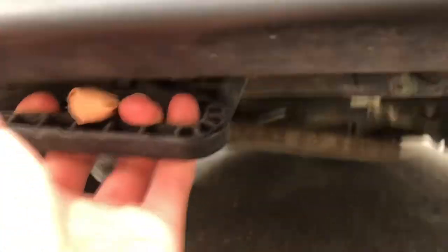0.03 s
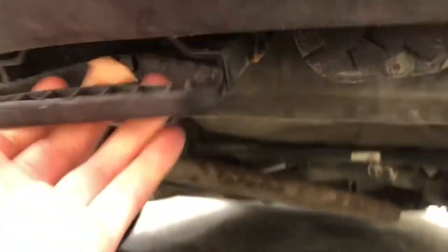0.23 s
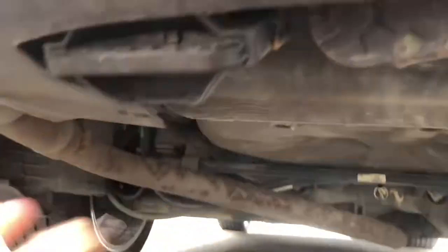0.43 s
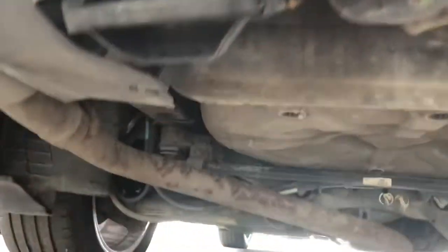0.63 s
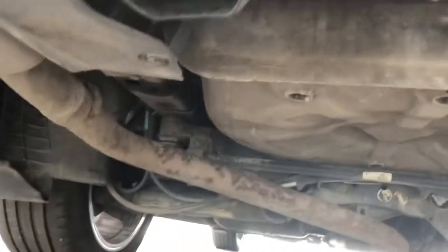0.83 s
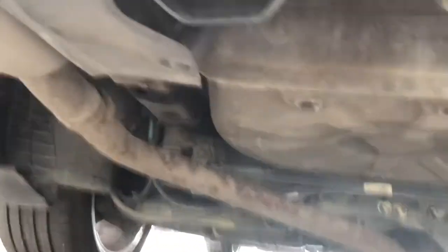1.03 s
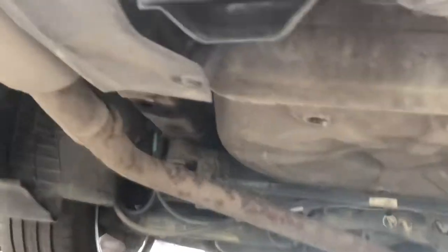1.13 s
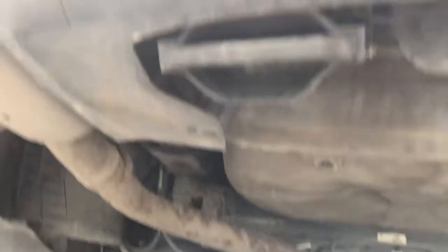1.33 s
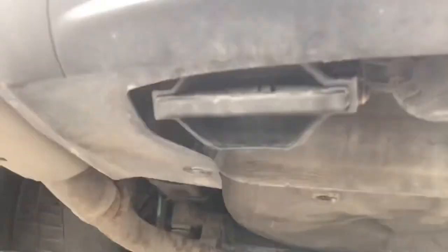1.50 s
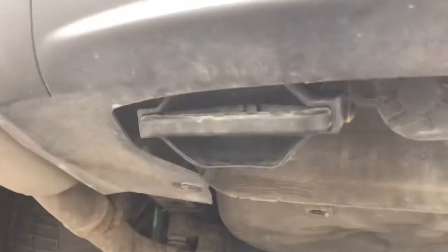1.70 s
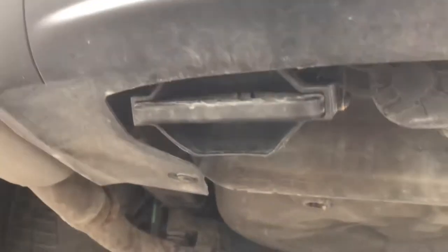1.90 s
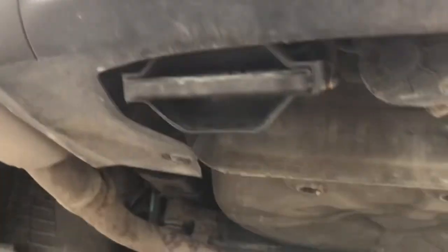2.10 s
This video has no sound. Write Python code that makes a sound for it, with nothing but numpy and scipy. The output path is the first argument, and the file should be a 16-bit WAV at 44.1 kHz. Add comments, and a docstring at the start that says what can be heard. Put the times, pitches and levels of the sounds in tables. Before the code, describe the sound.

A plastic tray scrapes, knocks and snaps into its holder under a car.

```python
"""A soft rustle, light finger taps and a brief thin whine, then a plastic tray scrapes into its holder
under a car, knocks twice on its guides and snaps home with a hard double clack. Each blow rings the
tray and scatters between floor pan and ground; the snap leaves an underbody panel humming. A sleeve
brushes past as the arm draws back, and faint ticks and far whistles follow over a quiet outdoor rumble."""
import sys
import numpy as np
from scipy import signal
from scipy.fft import rfft, irfft, next_fast_len
from scipy.io import wavfile

SR = 44100
rng = np.random.default_rng(int(sys.argv[2]) if len(sys.argv) > 2 else 0)


def bounce(signal):
    """Save signal as a 16-bit WAV file at the path given by the first command-line argument."""
    frames = np.transpose(np.atleast_2d(signal))
    limited = np.clip(frames, -1, 1)
    pcm = np.round(limited * 32767).astype(np.int16)
    wavfile.write(sys.argv[1], SR, pcm)


N = 94815
T = np.arange(N) / SR

# tray hits holder: t/s, force/dB, low edge/Hz, high edge/Hz, crack/dB, crack top/Hz, "guide" or "latch"
KNOCKS = [(0.2047, -18, 1200, 2520, -30, 2800, "guide"), (0.2058, -15, 600, 1700, -36.5, 2200, "guide"),
          (0.2336, -13.5, 1300, 5800, -20, 6000, "guide"), (0.2372, -15, 450, 1350, -36.5, 1500, "guide"),
          (0.2775, -7.5, 1900, 6600, -9, 14620, "latch"), (0.2778, -21, 680, 1100, -19, 2316, "latch"),
          (0.2815, 0, 680, 2000, -21.5, 9000, "latch"), (0.2840, -14, 2600, 9400, -14, 14500, "latch")]
# tray modes: f/Hz, t60/s, level struck at the guide/dB, level struck at the latch/dB
TRAY_MODES = [(320, .1, -18, -21.5), (620, 0.014, -17, -17.5), (712, 0.073, -5, -13.5),
              (853, 0.031, -8.5, -1), (1148, .034, -3, -3), (1270, 0.045, -7, -19.5),
              (1566, .024, -4, -5.5), (1920, .014, -7, -10), (2266, 0.025, -7.5, -18.5),
              (3100, 0.015, -16, -6), (3710, .013, -14, -4.5), (4060, 0.015, -10.5, -29),
              (5600, 0.015, -11, -5), (7060, .011, -24, -12), (8200, 0.021, -27.5, -10.5)]
# colour of the crack on each hit: f/Hz, level/dB
CRACK_COLOUR = [(450, -27), (1000, -6), (2100, 4.5), (2550, -5), (3200, -1), (6000, -1.5), (7600, -6.5),
                (8300, -3), (9300, -11), (12000, -16.5), (16000, -10)]
# underbody panel modes: f/Hz, level/dB, t60/s
PANEL_MODES = [(63, -44.5, .35), (108, -36.5, .25), (127, -31.5, .38), (183, -41.5, 0.59),
               (350.2, -27.5, 0.16), (533, -29.5, 0.2)]
# envelope of the scrape along the guides: t/s, level/dB
SLIDE_LEVEL = [(0.13, -69.5), (0.18, -57.5), (0.2, -39.5), (0.23, -39), (0.275, -40.5), (0.29, -80)]
# colour of the scrape: f/Hz, level/dB
SLIDE_COLOUR = [(150, -3), (400, -3), (700, 1), (1500, 4.5), (3000, -7.5), (4200, -8.5), (5500, -7.5),
                (10000, -9), (16000, -12)]
# light touches of fingers and plastic: t/s, level/dB, low edge/Hz, high edge/Hz, t60/s
TICKS = [(0.0145, -45, 420, 800, .06), (0.022, -39, 620, 744.4, .03), (0.129, -49.5, 2430, 15000, 0.068),
         (0.1605, -40, 999, 14250, 0.019), (0.1731, -48.5, 2054, 9985, 0.049), (0.175, -41, 620, 900, .035),
         (0.177, -36.5, 160, 281, 0.055), (0.194, -37, 1153, 1867, .04), (0.1995, -35, 4980, 15000, 0.022),
         (0.238, -29, 299.7, 380, .11), (0.26, -42.5, 3994, 10160, 0.018), (0.417, -51, 2450, 14000, 0.052),
         (0.927, -55.5, 299, 3555, 0.026), (0.99, -58, 1498, 3940, 0.03), (1.021, -54.5, 500, 3383, 0.046),
         (1.061, -58, 800, 3497, 0.028), (1.123, -59.5, 797, 2600, 0.057), (1.328, -55.5, 300, 1553, 0.062),
         (1.335, -56, 685, 4225, 0.019), (1.978, -50, 2600, 6900, .02), (1.983, -57, 2300, 7040, 0.15)]
# sleeve strokes: t/s, level/dB, attack/s, hold/s, release/s
SLEEVE_STROKES = [(-0.02, -51, 0.032, 0.0083, 0.088), (0.482, -53.5, 0.088, 0.067, 0.23)]
# colour of the cloth: f/Hz, level/dB
CLOTH_COLOUR = [(200, 5), (600, -4), (1100, -0.5), (2000, -9), (4000, -7), (8000, -12.5), (12000, -13.5),
                (16000, -20)]
# reverb colour of the gap between floor pan and ground: f/Hz, level/dB
GAP_COLOUR = [(100, -14), (330, -2), (440, -5.5), (600, -1), (830, 1), (1000, -8), (1190, -1), (1390, -5.5),
              (1560, 6), (1900, -6), (2400, -9.5), (3200, -5.5), (4700, -7.5), (7000, -12.5), (10000, -19),
              (16000, -24)]
# reverb decay in that gap: f/Hz, t60/s
GAP_T60 = [(100, 0.43), (500, 0.28), (800, .27), (1500, 0.28), (3500, .23), (8000, 0.2), (16000, 0.2)]
# colour of the outdoor air: f/Hz, level/dB
AIR_COLOUR = [(15, -58.5), (25, -31), (45, -8.5), (157, -3), (200, -10.5), (229, -5), (384, -13.5),
              (463, -12), (677, -17.5), (1020, -13), (1330, -20), (4490, -28.5), (4870, -29.5),
              (14800, -41.5), (16000, -46)]
# colour of the rumble: f/Hz, level/dB
RUMBLE_COLOUR = [(40, -20.5), (65, -5), (110, -3), (160, 1), (240, -0.5), (330, -13.5), (800, -54)]
# envelope of the rumble: t/s, level/dB
RUMBLE_LEVEL = [(0, -73), (0.12, -66.5), (0.8, -66), (1.05, -61.5), (1.3, -67), (1.42, -56.5), (1.55, -65),
                (2.15, -68)]
# tones of the opening whine: f/Hz, level/dB
WHINE_TONES = [(10791, -65), (14388, -64)]
# distant whistles: t/s, length/s, f/Hz, level/dB
WHISTLES = [(0.897, 0.14, 4620, -75), (1.165, 0.23, 3320, -76.5), (1.477, 0.12, 4620, -77.5),
            (1.678, 0.21, 3170, -77.5)]

FORCE_SEND_DB, RING_SEND_DB, CRACK_SEND_DB, SMALL_SEND_DB = 8.5, -28, -22.5, -12.5  # into the gap reverb


def blows(place):
    """The force of the tray hitting the guide or the latch: one band-limited click a blow."""
    return sum(from_db(db) * band(click(start), low, high, order=3)
               for start, db, low, high, _, _, where in KNOCKS if where == place)


def tray_ring(guide, latch):
    """The body of the clack: blows ring the tray's modes in a balance set by where they land."""
    return sum(ring(from_db(guide_db) * guide + from_db(latch_db) * latch, hz, t60)
               for hz, t60, guide_db, latch_db in TRAY_MODES)


def tray_crack(t60=.018):
    """The hard edge of the clack: a short burst of noise on every blow."""
    return sum(from_db(db) * dying(start, t60) * rms_one(band(noise(CRACK_COLOUR), low, top, order=4))
               for start, _, low, _, db, top, _ in KNOCKS)


def panel(start=.282, build_s=.02):
    """The snap spreads into the underbody panel, which swells and hums on."""
    hum = sum(from_db(db) * ring(click(start), hz, t60) for hz, db, t60 in PANEL_MODES)
    return rising(start, build_s) * hum


def slide(slips_per_s=4000):
    """Plastic rubs on plastic in dense tiny slips."""
    slips = (rng.random(N) < slips_per_s / SR) * rng.choice([-1, 1], N)
    sliding = (T > SLIDE_LEVEL[0][0]) & (T < SLIDE_LEVEL[-1][0])
    return sliding * level(SLIDE_LEVEL) * coloured(slips, SLIDE_COLOUR)


def ticks():
    """Fingers and plastic touch lightly, each a quickly dying noise burst in its own band."""
    touches = np.zeros(N)
    for start, db, low, high, t60 in TICKS:
        burst = dying(start, t60) * rng.standard_normal(N)
        makeup = np.sqrt(SR / 2 / max(high - low, 20))  # restores the power the filter takes away
        touches += from_db(db) * makeup * band(burst, low, high, order=3)
    return touches


def sleeve():
    """Brushing cloth hisses in soft strokes."""
    strokes = sum(from_db(db) * np.interp(T, start + np.cumsum([0, attack, hold, release]), [0, 1, 1, 0])
                  for start, db, attack, hold, release in SLEEVE_STROKES)
    return strokes * noise(CLOTH_COLOUR)


def under_car(send, predelay_s=.0034, build_s=.0026):
    """Dense reflections between floor pan and ground; the treble dies first."""
    edges_hz = np.geomspace(60, 17000, 13)
    wash = noise(GAP_COLOUR)
    tail = sum(band(wash, low, high, order=4) * dying(0, at_hz(GAP_T60, np.sqrt(low * high)))
               for low, high in zip(edges_hz, edges_hz[1:]))
    tail *= rising(predelay_s, build_s)
    return signal.fftconvolve(send, tail / np.sqrt(np.sum(tail ** 2)))[:N]


def outdoors(air_db=-59.5):
    """The bed: steady outdoor air and a wavering rumble."""
    return from_db(air_db) * noise(AIR_COLOUR) + level(RUMBLE_LEVEL) * noise(RUMBLE_COLOUR)


def whine(attack_s=.03, release_s=.018, end_s=.18):
    """Two faint, very high tones fade in and out at the start."""
    fade = np.clip(np.minimum(T / attack_s, (end_s - T) / release_s), 0, 1)
    return fade * sum(from_db(db) * np.sin(2 * np.pi * hz * T) for hz, db in WHINE_TONES)


def whistles(t60=.03):
    """Thin wavering tones far away: noise through a narrow resonance, under a rounded fade."""
    tones = np.zeros(N)
    for start, length, hz, db in WHISTLES:
        position = 2 * (T - start) / length - 1  # -1 to 1 across the whistle
        arch = np.sqrt(np.clip(1 - position ** 2, 0, 1))
        tones += from_db(db) * arch * rms_one(ring(rng.standard_normal(N), hz, t60))
    return tones


def from_db(db):
    """Decibels to gain."""
    return 10 ** (np.asarray(db) / 20)


def rms_one(x):
    """Scale to unit rms."""
    return x / np.sqrt(np.mean(x ** 2) + 1e-20)


def at_hz(points, hz):
    """Read a table on a log-frequency axis."""
    freqs, values = np.transpose(points)
    return np.interp(np.log(np.maximum(hz, 1)), np.log(freqs), values)


def level(points):
    """A gain envelope through points of t/s, level/dB."""
    return from_db(np.interp(T, *np.transpose(points)))


def coloured(x, colour):
    """EQ a signal with a colour curve; rms 1."""
    size = next_fast_len(N)
    hz = np.arange(size // 2 + 1) * SR / size
    spectrum = rfft(x, size) * from_db(at_hz(colour, hz))
    return rms_one(irfft(spectrum, size)[:N])


def noise(colour):
    """Coloured noise of rms 1."""
    return coloured(rng.standard_normal(N), colour)


def band(x, low_hz, high_hz, order=2):
    """High-pass, then low-pass."""
    for hz, kind in ((low_hz, "high"), (high_hz, "low")):
        sos = signal.butter(order, np.clip(hz, 10, .45 * SR), kind, fs=SR, output="sos")
        x = signal.sosfilt(sos, x + 1e-18)
    return x


def click(start):
    """A unit impulse at the start time."""
    return np.maximum(1 - np.abs(T - start) * SR, 0)


def rising(start, build_s):
    """An envelope that eases from 0 towards 1."""
    return 1 - np.exp(-np.maximum(T - start, 0) / build_s)


def dying(start, t60):
    """An envelope that jumps to 1, then falls 60 dB in t60 seconds."""
    return (T >= start) * np.exp(-np.log(1000) * np.clip((T - start) / t60, 0, 10))


def ring(force, hz, t60):
    """One mode: a unit click sets off a decaying sine of height about 1."""
    radius = np.exp(-np.log(1000) / (t60 * SR))
    angle = 2 * np.pi * hz / SR
    return signal.lfilter([0, np.sin(angle)], [1, -2 * radius * np.cos(angle), radius ** 2], force + 1e-18)


def scene():
    """The mono mix: tray and hand up close, their reflections under the car, the outdoors behind."""
    guide, latch = blows("guide"), blows("latch")
    body = tray_ring(guide, latch)
    crack = tray_crack()
    small_sounds = ticks() + slide()
    send = (from_db(FORCE_SEND_DB) * (guide + latch) + from_db(RING_SEND_DB) * body
            + from_db(CRACK_SEND_DB) * crack + from_db(SMALL_SEND_DB) * small_sounds)
    foreground = body + crack + small_sounds + under_car(send) + panel() + sleeve()
    return (foreground + outdoors() + whine() + whistles())[None]


def record(dry, ceiling=.88, low_cut_hz=26, high_cut_hz=15900):
    """Soft clipping rounds the loudest peaks; the deep bass and the very top are cut."""
    rounded = dry / (1 + (dry / ceiling) ** 6) ** (1 / 6)
    low_cut = signal.butter(2, low_cut_hz, "high", fs=SR, output="sos")
    high_cut = signal.ellip(10, .2, 80, high_cut_hz, fs=SR, output="sos")
    return signal.sosfilt(high_cut, signal.sosfilt(low_cut, rounded))


dry = scene()
out = record(dry)
bounce(out)
```